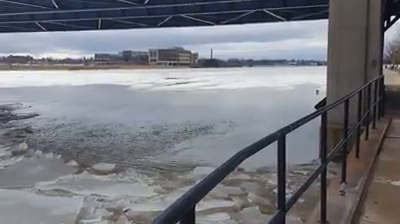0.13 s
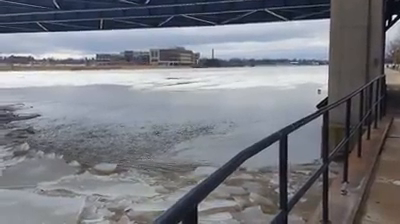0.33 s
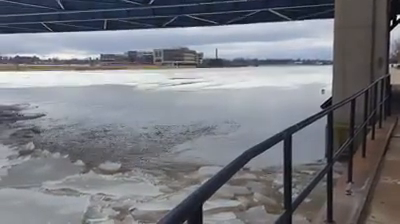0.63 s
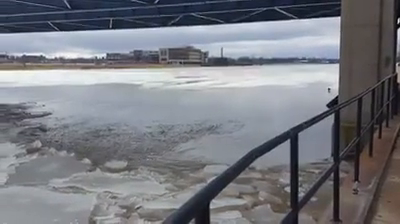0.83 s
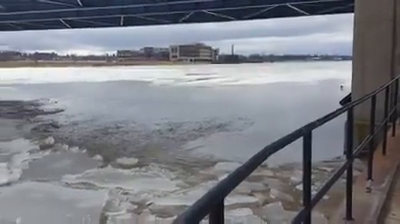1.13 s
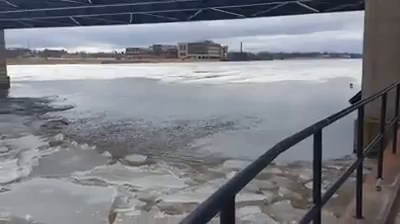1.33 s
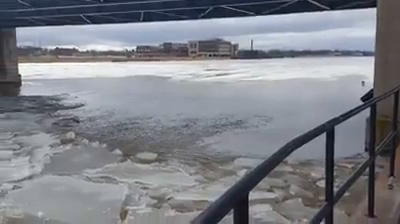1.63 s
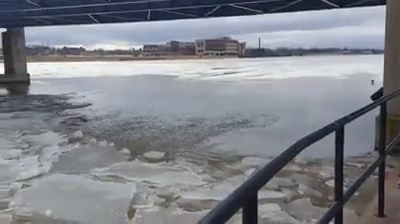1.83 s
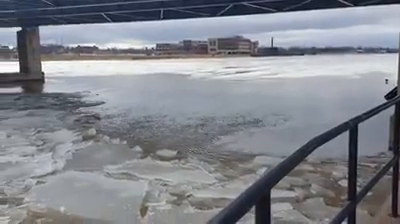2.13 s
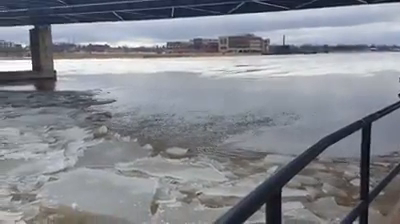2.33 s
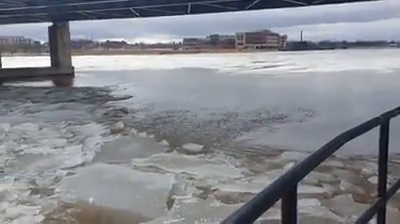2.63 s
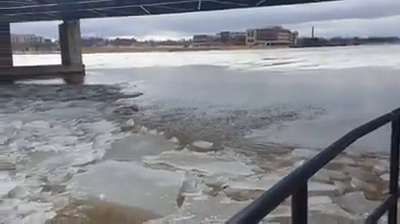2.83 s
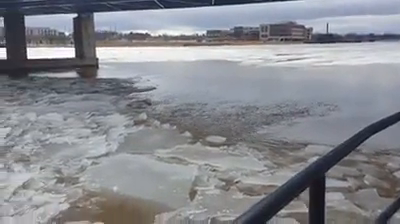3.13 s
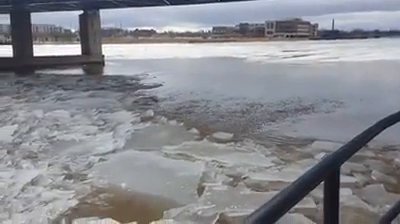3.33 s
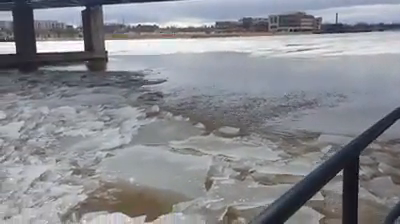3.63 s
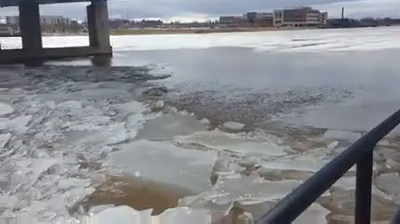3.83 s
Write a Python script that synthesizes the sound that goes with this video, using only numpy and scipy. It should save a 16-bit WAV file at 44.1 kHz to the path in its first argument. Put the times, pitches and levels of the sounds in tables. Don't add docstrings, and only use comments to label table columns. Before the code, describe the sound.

Under a bridge beside a river of broken ice, constant dull traffic and water roar continues throughout, with uneven low wind thumps on either side, soft water slaps and faint ice clicks, treble slightly watery.

```python
import sys
import numpy as np
from scipy import signal
from scipy.fft import rfft, irfft
from scipy.io import wavfile
from scipy.ndimage import uniform_filter1d

SR = 44100
rng = np.random.default_rng(int(sys.argv[2]) if len(sys.argv) > 2 else 0)


def bounce(signal):
    frames = np.transpose(np.atleast_2d(signal))
    limited = np.clip(frames, -1, 1)
    pcm = np.round(limited * 32767).astype(np.int16)
    wavfile.write(sys.argv[1], SR, pcm)


def volts_from_db(level):
    exponent = np.asarray(level, float) / 20
    return 10 ** exponent


N = 175959
FFT_HZ = np.fft.rfftfreq(N, 1 / SR)

# (time [s], gust strength [dB], left over right [dB])
GUST_PATH = [(0.0, -42.5, -5), (1.01, -40, 0.5), (1.33, -32.5, 6.5), (1.51, -37, -10.5), (1.6, -38, -1),
             (1.64, -33.5, -4.5), (1.71, -30.5, 1.5), (1.89, -51, -11), (1.93, -27, 5.5),
             (2.06, -44, -13.5), (2.13, -36.5, -8.5), (2.46, -39, 3), (3.59, -46, 7), (3.73, -30, 4),
             (3.79, -50, -4), (3.94, -37.5, 5.5), (3.99, -46, -7.5)]
# (from [Hz], to [Hz], shift up [Hz])
TREBLE_COPIES = [(3690, 6700, 3015), (6700, 8940, 5254)]


def evened(x):
    return x / np.sqrt(np.mean(x ** 2) + 1e-20)


def read(points, hz):
    f, value = np.transpose(points)
    return np.interp(np.log(hz + 1), np.log(f + 1), value)


def curve(rows, col):
    rows = np.array(rows)
    return np.interp(np.arange(N) / SR, rows[:, 0], rows[:, col])


def smooth(x, seconds):
    n = max(int(seconds * SR), 1)
    return uniform_filter1d(uniform_filter1d(x, n, axis=-1), n, axis=-1)


def rumble():
    # (time [s], level [dB], left port lag [ms], focus of the source [ratio])
    flow = [(0, -45, 0.35, .7), (.5, -45.5, 0.34, .85), (.8, -46, 0.31, 0.77), (.93, -46.5, 0.35, 1.1),
            (1.25, -46, 0.33, .95), (1.4, -45.5, 0.32, 1.12), (1.72, -45.5, 0.32, 1.12),
            (1.85, -45.5, .31, 1.1), (2.03, -45.5, 0.33, 1.1), (2.36, -45.5, 0.29, 1.1),
            (2.45, -46, 0.32, .72), (2.9, -45, 0.25, .85), (3.19, -47, .33, .75), (3.27, -46.5, 0.3, 1.1),
            (3.35, -45, 0.4, 0.6), (3.44, -45.5, 0.32, 1), (3.93, -45.5, .28, 1.15),
            (3.99, -45.5, 0.3, 0.94)]
    # (time [s], level [dB])
    hiss = [(0.0, -65.5), (0.95, -67), (2.44, -68), (2.76, -67), (3.47, -65.5), (3.99, -63)]
    # (frequency [Hz], density [dB per Hz])
    colour = [(25, -30), (70, 0), (300, 1), (800, -2), (1600, -8), (2200, -14), (3600, -26.5),
              (9000, -29.5)]
    # (frequency [Hz], likeness [0-1])
    likeness = [(60, 1), (400, .45), (900, .5), (1400, 0.8), (1800, .95), (2300, .55), (3500, 0.14),
                (9000, 0)]
    # (frequency [Hz], share [ratio])
    follow = [(300, 1.8), (900, 3.2), (2500, 1.8), (4000, 0.58)]
    level_db, patch_db, flicker_db = -35.5, 0.84, 0.2151

    frames, hz = N // 256 + 5, np.fft.rfftfreq(1024, 1 / SR)[:, None]
    at = np.clip(np.arange(frames) * 256, 0, N - 1)
    a, b, c, d, patches = rng.standard_normal((frames, 513, 5)).T
    patches = uniform_filter1d(patches, size=12, axis=0)
    patches = evened(uniform_filter1d(patches, size=14, axis=1))

    same = np.clip(read(likeness, hz) * curve(flow, 3)[at], 0, 1)
    right = a + 1j * b
    lag = np.exp(-2j * np.pi * hz * curve(flow, 2)[at] / 1000)
    left = same * right * lag + np.sqrt(1 - same ** 2) * (c + 1j * d)

    swell_db = curve(flow, 1) + flicker_db * evened(smooth(rng.standard_normal(N), 0.036))
    swell_db = (swell_db - swell_db.mean())[at]
    hiss_db = curve(hiss, 1)
    hiss_db = (hiss_db - hiss_db.mean())[at]
    z = np.array([left, right])
    z *= volts_from_db(read(colour, hz) + read(follow, hz) * (patch_db * patches + swell_db))
    z *= volts_from_db(np.clip(hz / 2000 - 1, 0, 1) * hiss_db)
    return volts_from_db(level_db) * evened(signal.istft(z, nperseg=1024, noverlap=768)[1][:, :N])


def wind():
    # (frequency [Hz], density [dB per Hz])
    buffet = [(25, -56), (45, -18), (80, -6), (140, 7.5), (240, 2), (400, -10), (700, -16.5), (1500, -61.5)]
    lump_db, lump_s, gust_db = 2, 0.015, 1.5
    air = irfft(rfft(rng.standard_normal((2, N))) * volts_from_db(read(buffet, FFT_HZ)), N)
    lumps = smooth(rng.standard_normal((3, N)), lump_s)
    lumps = evened(lumps[:2] + 0.25 * lumps[2])
    pan_db = np.array([[.5], [-.5]]) * curve(GUST_PATH, 2)
    return volts_from_db(curve(GUST_PATH, 1) + gust_db + pan_db) * evened(air * volts_from_db(lump_db * lumps))


def thumps():
    # (time [s], peak [dB], pitch [Hz], left over right [dB])
    pushes = [(1.031, -25, 195, 2), (1.208, -25.5, 194, -10), (1.261, -37, 174.9, -5),
              (1.297, -33.5, 492, -2), (1.302, -17.5, 243, 1), (1.345, -31.5, 195.3, -5),
              (1.376, -25.5, 615.5, 7), (1.425, -25, 209, -1), (1.47, -28, 391, 8), (1.612, -29, 187, -2),
              (1.632, -21.5, 697.5, 2), (1.64, -25.5, 213.5, -17), (1.67, -22, 175.2, -8),
              (1.704, -26, 259, 9), (1.73, -19, 156.6, 0), (1.753, -26.5, 621, 3), (1.772, -29.5, 457, 9),
              (1.846, -26.5, 217, 12), (1.931, -19, 190, 0), (1.945, -35.5, 424, -8.5),
              (1.951, -19, 251, -5.5), (1.956, -31.5, 415, 0.5), (1.963, -19.5, 395, 4.5),
              (1.986, -20.5, 483, -2), (1.987, -21.5, 265, 5.5), (2.001, -32.5, 471, -1),
              (2.007, -21, 465, 0.5), (2.12, -26.5, 222, -2), (2.235, -36, 508, 23), (2.236, -20, 223, 9.5),
              (2.398, -27, 236, 10), (2.426, -28, 541, 14.5), (3.091, -26.5, 179, -6),
              (3.374, -28, 95, 0.5), (3.452, -32, 69, -5), (3.709, -24, 224.8, 8), (3.728, -26, 228, 1),
              (3.946, -26.5, 185.3, 0),
              (.092, -25, 207, 0), (0.501, -39, 52, 5.5), (.62, -36, 60, 0), (1.084, -27, 595, 1),
             (1.422, -31.5, 646, 6), (2.598, -47, 584, 0), (2.676, -29.5, 681, -7.5),
             (2.841, -26.5, 560, 0), (3.038, -33.5, 759, 1.5), (3.06, -27, 130, 2.5),
             (3.441, -32.5, 110, 0), (3.689, -26, 260, -1)]
    fall_cycles, rise_share = 0.96, 0.51
    level_db, port_turn = -1, .6
    out, u = np.zeros((2, N + 8000)), np.arange(-4000, 4000) / SR
    side = np.array([[1], [-1]])
    for k, (s, db, hz, pan_db) in enumerate(pushes):
        cycles = fall_cycles * np.where(u < 0, rise_share, 1)
        shape = np.exp(-.5 * (u * hz / cycles) ** 2)
        push = shape * np.sin(2 * np.pi * hz * (u + s) + (-1) ** k * port_turn * side)
        out[:, round(s * SR):][:, :8000] += volts_from_db(db + level_db + side * pan_db / 2) * push
    return out[:, 4000:N + 4000]


def ticks():
    # (time [s], peak [dB], rattle length [s], thud [dB])
    contacts = [
        (.0917, -51.5, 0.0063, -6),
        (0.997, -50, 0.0089, -16.5),
        (1.142, -48.5, 0.0057, -13),
        (1.15, -47.5, 0.011, -11),
        (3.2035, -36.5, 0.005, 0.5),
        (3.2105, -59.5, 0.004, -5),
        (3.347, -36.5, 0.004, -4),
        (3.353, -54.5, 0.013, -5),
    ]
    # (frequency [Hz], width [Hz], level [dB])
    floe = [(1210, 650, -3.5), (1600, 110, 10), (2300, 180, 6.5), (2896, 780, -1.5), (4653, 980, 7),
            (7150, 180, 1.5)]
    lag_s, level_db = 0.00025, 3.5
    out, t = np.zeros(N + 4000), np.arange(2000) / SR
    modes = np.array([volts_from_db(db) * np.sqrt(w) * np.exp(-np.pi * w * t) * np.sin(2 * np.pi * hz * t)
                      for hz, w, db in floe])
    thud, bright = modes[:4].sum(0), modes[4:].sum(0)
    grits = rng.standard_normal((len(contacts), 2000))
    for (s, db, length, thud_db), grit in zip(contacts, grits):
        rattle = grit * np.minimum(t / 0.0003, 1) * np.exp(-(t / max(length, .001)) ** 2)
        ring = (bright + volts_from_db(thud_db) * thud) / np.linalg.norm(bright)
        out[round(s * SR):][:3999] += volts_from_db(db + level_db) * np.convolve(rattle, ring)
    return np.array([np.roll(out, round(lag_s * SR))[:N], out[:N]])


def ports(x):
    # (frequency [Hz], loss [dB])
    shadow = [(60, 0), (2000, .2), (3600, 1.2), (3800, 6.5), (5500, 13.5), (7000, 19.5), (9000, 19.5)]
    loss_db = read(shadow, FFT_HZ)
    return irfft(rfft(x) * volts_from_db([np.zeros_like(loss_db), -loss_db]), N)


def scene():
    return ports(rumble() + ticks()) + wind() + thumps()


def thinned(x):
    # (frequency [Hz], step [dB])
    step_curve = [(60, -30.5), (500, -30.5), (1100, -27), (1500, -30), (2000, -30.5), (2600, -35.5),
                  (3100, -32), (3700, -29)]
    # (frequency [Hz], share [ratio])
    waver_curve = [(1000, .4), (2400, 0.38), (3000, 1.1), (3700, 1.5)]
    # (time [s], coarser step [dB])
    thrift = [(0, -3), (.06, 3.5), (.25, 1), (.4, 4), (1.05, 2.5), (1.13, -3), (1.98, -1.5), (2.06, 3),
              (2.18, -3), (2.42, -3.5), (2.5, 3), (2.8, 0.5), (3.0, 1.5), (3.08, -2), (3.35, -3),
              (3.48, 2.5), (3.6, -2), (3.99, 1.5)]
    frame_db, band_db = 1.07, 3.4
    gust_share, round_up = .1, .41

    hop, lines = 2048, int(TREBLE_COPIES[0][0] * 4096 / SR)
    n, k = np.arange(2 * hop)[:, None] + .5, np.arange(lines) + .5
    window = np.sin(np.pi * n / (2 * hop))
    basis = window * np.cos(np.pi / hop * (n + hop / 2) * k) * np.sqrt(2 / hop)
    frames = N // hop + 2
    both = np.array([x[0] + x[1], x[0] - x[1]]) / 2
    both = np.pad(both, ((0, 0), (hop, frames * hop - N))).reshape(2, -1, hop)
    z = np.concatenate([both[:, :-1], both[:, 1:]], 2) @ basis

    hz = k * SR / (2 * hop)
    waver = read(waver_curve, hz)
    chance = rng.standard_normal((frames, 40))
    band_chance = np.repeat(chance[:, 1:], 12, axis=1)[:, :lines]
    step = volts_from_db(read(step_curve, hz) + frame_db * waver * chance[:, :1] + band_db * band_chance)
    at = np.minimum(np.arange(frames) * hop, N - 1)
    gust_db = smooth(curve(GUST_PATH, 1), 0.028)[at]
    coarser_db = curve(thrift, 1)[at] - gust_share * (gust_db - gust_db.mean())
    step = step * volts_from_db(waver * coarser_db[:, None])

    back = (np.sign(z) * np.floor(abs(z) / step + round_up) * step) @ basis.T
    mid, side = (back[:, 1:, :hop] + back[:, :-1, hop:]).reshape(2, -1)[:, :N]
    return np.array([mid + side, mid - side])


def unthinned(low, dry):
    moments = [
        1.15,
        3.207,
        3.351,
    ]
    half_width_s, top_hz = 0.0095, 3260
    t = np.arange(N) / SR
    share = sum(np.exp(-((t - s) / half_width_s) ** 4) for s in moments)
    whole = irfft(rfft(dry) * (FFT_HZ < top_hz), N)
    return low + share * (whole - low)


def fenced(x):
    # (from [Hz], to [Hz])
    empty = [(0, 3660), (6480, 6680)]
    return irfft(rfft(x) * np.prod([(FFT_HZ < lo) | (FFT_HZ > hi) for lo, hi in empty], axis=0), N)


def rebuilt_treble(low, dry):
    boost_db, fill = 7, 0.79
    true, thin, copy = rfft(dry), rfft(low), np.zeros((2, N // 2 + 1), complex)
    colour = np.sqrt(abs(uniform_filter1d(abs(true) ** 2, size=1200, axis=1))) + 1e-12
    flat = thin / colour
    for lo, hi, shift in np.round(np.array(TREBLE_COPIES) * N / SR).astype(int):
        copy[:, lo:hi] = flat[:, lo - shift:hi - shift] * colour[:, lo:hi]

    def local_power(z):
        power = uniform_filter1d(abs(z) ** 2, size=6, axis=1)
        return abs(uniform_filter1d(power, size=3, axis=2))

    have, want = (signal.stft(v, nperseg=256, noverlap=192)[2] for v in (irfft(copy, N), dry))
    have_power, want_power = local_power(have), local_power(want)
    shaped = have * np.minimum(np.sqrt(want_power / (have_power + 1e-20)), volts_from_db(boost_db))
    copy_power = abs(uniform_filter1d(abs(have) ** 2, size=9, axis=2))
    alive = np.minimum(1.35 * copy_power / (want_power + 1e-20), 1)
    shaped = np.sqrt(1 - fill) * shaped + np.sqrt(fill) * alive * want
    return fenced(signal.istft(shaped, nperseg=256, noverlap=192)[1][:, :N])


def low_pass(x):
    return signal.sosfilt(signal.butter(12, 9310, fs=SR, output="sos"), x)


def record(dry):
    low = unthinned(thinned(dry), dry)
    return low_pass(low + rebuilt_treble(low, dry))


dry = scene()
out = record(dry)
bounce(out)
```